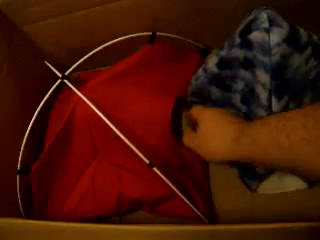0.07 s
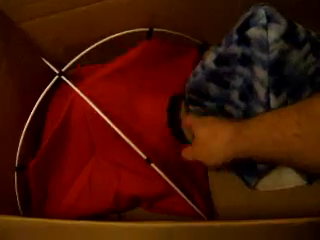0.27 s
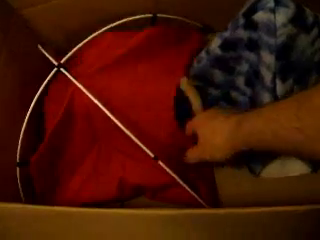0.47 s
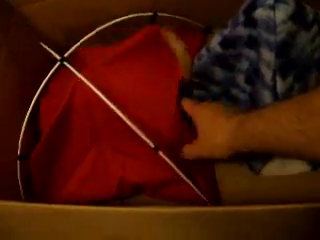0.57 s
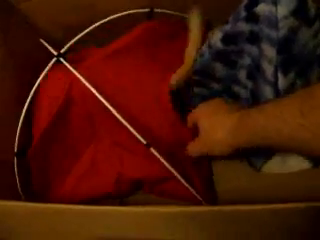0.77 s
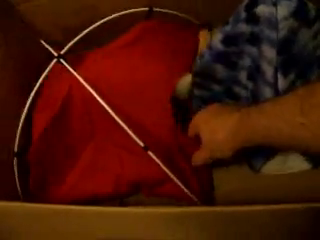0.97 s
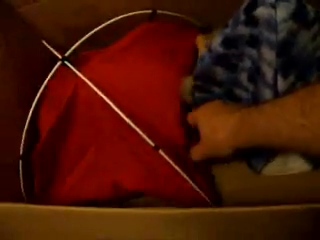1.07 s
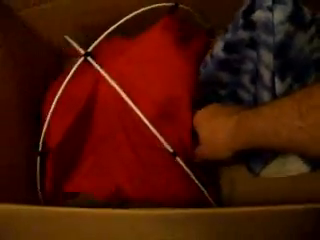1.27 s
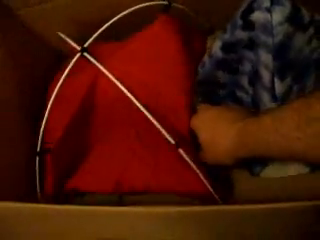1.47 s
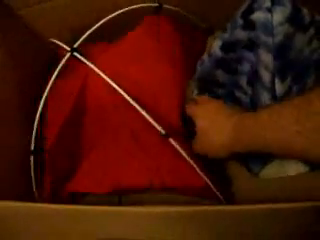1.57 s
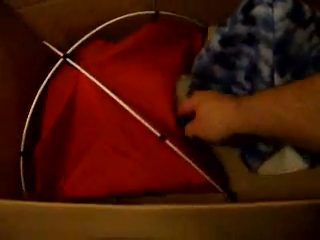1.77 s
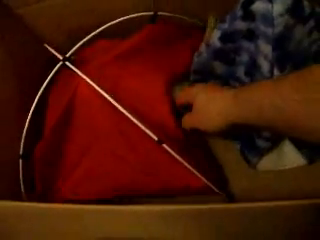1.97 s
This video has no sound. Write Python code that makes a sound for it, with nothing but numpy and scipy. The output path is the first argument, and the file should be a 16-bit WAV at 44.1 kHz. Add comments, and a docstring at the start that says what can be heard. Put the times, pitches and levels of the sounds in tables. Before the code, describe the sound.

Cloth scuffling from a small animal playing in a fabric tent: bright crease cracks, faint squeaks, growing paw knocks, one bassy box thump and rattle midway, then sparser rustling and claw ticks, close and indoors, limited treble.

```python
"""Ferret play in a boxed tent

A hand plays with a ferret in a small fabric tent that stands in a cardboard box, indoors.
Filtered noise makes the sliding cloth, its snapping creases and the paws' knocks on cardboard.
Trains of ticks make the claws on the weave, and gliding harmonic tones a few short squeaks.
One pounce makes the box boom and the tent frame clatter, as sums of decaying modes."""
import sys
import numpy as np
from scipy import signal
from scipy.fft import rfft, irfft
from scipy.io import wavfile

SR = 44100
rng = np.random.default_rng(int(sys.argv[2]) if len(sys.argv) > 2 else 0)


def dump(signal):
    """Clip the signal to [-1, 1] and save it as 16-bit WAV at the path in sys.argv[1]."""
    limited = np.clip(np.atleast_2d(signal).T, -1, 1)
    pcm = np.round(limited * 32767).astype(np.int16)
    wavfile.write(sys.argv[1], SR, pcm)


N = 88332  # samples
T, HZ = np.arange(N) / SR, np.fft.rfftfreq(N, 1 / SR)
EDGE_HZ = 8020  # upper band edge


def amp(db):
    """Converts a level in decibels to an amplitude gain."""
    return 10 ** (np.asarray(db) / 20)


def unit(x):
    """Normalizes to a root-mean-square value of 1."""
    return x / np.sqrt(np.mean(x ** 2) + 1e-20)


def read(points, hz):
    """Spectral envelope: gain interpolated in dB over log frequency."""
    point_hz, db = np.transpose(points)
    return amp(np.interp(np.log(hz + 1), np.log(point_hz), db))


def add(mix, s, sound):
    """Superposition: sums a sound into the mix from its onset time, in place."""
    part = mix[round(s * SR):][:len(sound)]
    part += sound[:len(part)]


def colour(x, points):
    """Linear filtering: weights the spectrum of a full-length sound, then sets its rms to 1."""
    return unit(irfft(rfft(x) * read(points, HZ), N))


def wobble(seconds):
    """Low-pass noise: smooth random motion on a given time scale, at rms 1."""
    return unit(irfft(rfft(rng.standard_normal(N)) / (1 + (HZ * seconds) ** 2), N))


def burst(shape, rise, decay, size=8192):
    """Damped broadband impact: random-phase noise under a quick rise and exponential decay."""
    t, hz = np.arange(size) / SR, np.fft.rfftfreq(size, 1 / SR)
    env = (1 - np.exp(-t / rise)) * np.exp(-t / decay)
    env /= env.max()
    noise = irfft(shape(hz) * np.exp(2j * np.pi * rng.random(len(hz))))
    x = env * noise
    return x * np.linalg.norm(env) / np.linalg.norm(x)  # same energy as the envelope


def ring(blows, modes, rise):
    """Modal superposition: each blow starts the same sum of exponentially decaying sines."""
    modal_sum = sum(amp(db - 60 * T / t60) * np.sin(2 * np.pi * hz * T) for hz, db, t60 in modes)
    tone = -(1 - np.exp(-T / rise)) * modal_sum
    out = np.zeros(N)
    for s, db in blows:
        add(out, s, amp(db) * tone)
    return out


# spectrum of the steady room sound: (frequency [Hz], level [dB])
ROOM_SPECTRUM = [(20, 5.5), (60, -5.5), (110, -8), (180, -9.5), (300, -13), (480, -9), (720, -10.5),
                 (1200, -19.5), (2000, -17), (2500, -19.5), (3400, -28.5), (7200, -6.5), (8000, -18)]


def room_tone():
    """Stationary background noise: Gaussian noise with a fixed spectral envelope."""
    return amp(-43.5) * colour(rng.standard_normal(N), ROOM_SPECTRUM)


def echoes(x, t60, taps_per_s):
    """Reverberation as convolution: sparse reflections of random sign decay 60 dB in t60 seconds."""
    signs = (rng.random(N) < taps_per_s / SR) * rng.choice([-1, 1], N)
    taps = signs * amp(-60 * T / t60) * (T > .001)
    return signal.fftconvolve(x, taps / (np.linalg.norm(taps) + 1e-9))[:N]


# blows that make the box boom: (time [s], level [dB])
BOX_BLOWS = [(.992, -29.5), (1.0905, -14)]
# modes of the box: (frequency [Hz], level [dB], 60 dB decay time [s])
BOX_MODES = [(69.4, -3, 0.39), (80.7, 6.5, 0.1), (96.5, -14, 0.074), (40, -12, 0.29)]


def box_boom():
    """Low modal resonance: the box swells up slowly and rings at a few bass frequencies."""
    return ring(BOX_BLOWS, BOX_MODES, rise=0.011)


# blows that make the tent frame clatter: (time [s], level [dB])
FRAME_BLOWS = [(1.1485, -18.5), (1.155, -34.5)]
# modes of the frame: (frequency [Hz], level [dB], 60 dB decay time [s])
FRAME_MODES = [(358, -1, 0.15), (446.6, -5.5, 0.12), (486, -2.5, 0.1), (698, -3.5, 0.032),
               (1440, -17, 0.034), (1840, -3, 0.11), (1938, 3, 0.11), (2040, -20, 0.12), (2410, -13, 0.11)]


def frame_clatter():
    """Modal resonance of a struck frame: a sharp onset excites modes in the middle range."""
    return ring(FRAME_BLOWS, FRAME_MODES, rise=0.00034)


# one glide per squeak: (time [s], pitch [Hz], level [dB])
SQUEAK_GLIDES = [
    [(.311, 687, -67), (.32, 775, -34), (.332, 780, -27.5), (.348, 902, -36), (.366, 910, -37.5),
     (.377, 895, -48)],
    [(.735, 1330, -61), (.757, 1363, -30), (.781, 1323, -35.5), (.801, 1116, -37), (.812, 974, -45),
     (.835, 990, -41)],
    [(.876, 966, -38), (.888, 976, -45), (.903, 970, -37)],
]
# levels of the harmonics, from the fundamental up: (level [dB])
HARMONICS_DB = [-7.5, -25, -22.5, -25.5]
PITCH_JITTER, JITTER_S = 0.0238, 0.003  # rms fraction of the pitch, time scale


def squeaks():
    """Harmonic series: thin gliding tones with weak overtones and an unsteady pitch."""
    out = np.zeros(N)
    for glide in SQUEAK_GLIDES:
        s, hz, db = np.transpose(glide)
        pitch = np.interp(T, s, hz) * (1 + PITCH_JITTER * wobble(JITTER_S))
        turns = np.cumsum(pitch) / SR  # phase in cycles
        tone = sum(amp(level) * np.sin(2 * np.pi * k * turns) for k, level in enumerate(HARMONICS_DB, 1))
        out += unit(tone) * np.interp(T, s, amp(db), left=0, right=0)
    return out


# paws and body on cardboard: (time [s], level [dB], decay constant [s], pitch [Hz])
CARDBOARD_KNOCKS = [(0.691, -34, 0.04, 135), (.706, -31.5, 0.0027, 500), (.754, -21, 0.004, 740),
                    (0.755, -31.5, 0.033, 195), (.8712, -22, 0.0034, 920), (.869, -29.5, 0.011, 370),
                    (.935, -38, 0.0095, 400), (0.9851, -26, 0.0016, 1290), (.994, -29, 0.024, 190),
                    (.999, -29.5, 0.0092, 750), (1.089, -21.5, 0.024, 238), (1.094, -25, 0.0059, 704),
                    (1.13, -31, 0.0022, 600), (1.1474, -23.5, 0.016, 394), (1.132, -32, 0.029, 205),
                    (1.1487, -23, 0.009, 2050), (1.1535, -19.5, 0.0046, 1850), (1.169, -46, 0.0068, 450),
                    (1.273, -32, 0.0067, 760), (1.4338, -28.5, 0.0038, 1240), (1.438, -33, 0.009, 260),
                    (1.547, -31.5, 0.0026, 1300), (1.553, -36.5, 0.024, 243), (1.631, -33.5, 0.004, 860),
                    (1.683, -34.5, 0.038, 226), (1.6995, -33.5, 0.0045, 550), (1.7535, -25.5, 0.0024, 950),
                    (1.754, -35, 0.036, 165), (1.768, -34.5, 0.011, 750), (1.843, -25.5, 0.011, 850),
                    (1.856, -23.5, 0.014, 1160), (1.848, -36, 0.032, 340), (1.9431, -29, 0.011, 1630)]
KNOCK_OCTAVES, KNOCK_RISE_S = 0.51, 0.00036  # resonance width, rise constant
KNOCK_BED_DB, KNOCK_LOW_CUT_HZ, KNOCK_HIGH_CUT_HZ = -9, 300, 2500


def thud(hz, pitch):
    """Spectrum of a damped panel: one wide resonance over a band-limited bed."""
    peak = np.exp(-.5 * (np.log2((hz + 1) / pitch) / KNOCK_OCTAVES) ** 2)
    low_cut = hz / np.hypot(hz, KNOCK_LOW_CUT_HZ)
    bed = amp(KNOCK_BED_DB) * low_cut / np.hypot(1, hz / KNOCK_HIGH_CUT_HZ)
    return peak + bed / (1 + hz / (2 * pitch))


def knocks():
    """Heavily damped impact: dull blows on cardboard die away at once."""
    out = np.zeros(N)
    for s, db, decay, pitch in CARDBOARD_KNOCKS:
        add(out, s, amp(db) * burst(lambda hz: thud(hz, pitch), KNOCK_RISE_S, decay))
    return out


# broad bed of taut cloth, relative to its resonance peak: (frequency [Hz], level [dB])
CLOTH_BED = [(50, -39), (250, -23), (1000, -27.5), (2500, -11.5), (3800, -12.5), (5500, -8), (8000, -14)]


def crease(hz, pitch, width):
    """Spectrum of taut cloth: one resonance over a broad bed."""
    return np.exp(-.5 * ((hz - pitch) / width) ** 2) + read(CLOTH_BED, hz)


# claws over the weave: (time [s], length [s], level [dB], pitch [Hz], width [Hz],
# threads per second [1/s], unevenness [0-1])
CLAW_STROKES = [(0.8047, 0.0078, -19, 5440, 1000, 1140, 0.03), (0.804, 0.011, -27.5, 2540, 248, 1167, 0.07),
                (0.879, 0.017, -28.5, 6200, 1200, 880, 0.28), (1.621, 0.048, -41.5, 4870, 750, 1560, 0.48),
                (1.842, 0.0071, -14, 6450, 650, 1100, 0.01), (1.8482, .012, -21, 6800, 600, 1000, 0.29),
                (1.841, 0.0072, -19.5, 4200, 400, 1200, .1), (1.849, 0.024, -28, 4100, 250, 1200, 0.13)]
STROKE_SKEW = 0.65  # below 1 the force peaks early in the stroke


def scratches(size=4096, count=120):
    """Quasi-periodic impulse excitation: a claw ticks from thread to thread, swelling and letting go."""
    out, hz = np.zeros(N), np.fft.rfftfreq(size, 1 / SR)
    for s, length, db, pitch, width, rate, uneven in CLAW_STROKES:
        gaps, force = rng.standard_normal((2, count))
        at = np.cumsum(np.exp(uneven * gaps)) / rate - .5 / rate
        swell = np.sin(np.pi * np.clip(at / length, 0, 1) ** STROKE_SKEW)
        push = swell * np.exp(uneven * force)
        # each tick is a phase ramp in the spectrum, so it can fall between samples
        impulses = push @ np.exp(-2j * np.pi * np.outer(at, hz))
        ticks = irfft(impulses * crease(hz, pitch, width) * (hz < EDGE_HZ))
        add(out, s, amp(db) * unit(ticks) * np.sqrt(length * SR / size))  # level over the stroke
    return out


# creases snapping: (time [s], level [dB], decay constant [s], pitch [Hz])
CREASE_SNAPS = [(0.3185, -26.5, 0.0017, 5560), (0.4228, -10, 0.002, 6770), (0.426, -14, 0.00063, 6460),
                (0.4321, -12.5, 0.00082, 6500), (0.4472, -23.5, .0018, 6500), (.5585, -29.5, 0.0013, 4750),
                (0.706, -30, 0.0036, 4440), (0.845, -17, 0.0025, 3870), (.9012, -30, 0.00092, 7200),
                (0.9068, -12, 0.00051, 7200), (0.9417, -23.5, 0.0019, 6150), (0.9993, -24.5, 0.0036, 2970),
                (1.098, -20, 0.0016, 3500), (1.1313, -20, 0.0016, 4600), (1.1477, -12, 0.0016, 7400),
                (1.153, -18.5, 0.0036, 5200), (1.159, -22, 0.0022, 7200), (1.169, -11, 0.0015, 7170),
                (1.2208, -25.5, 0.0013, 6060), (1.531, -35, .002, 5000), (1.548, -28, 0.0026, 2480),
                (1.699, -27.5, 0.0026, 5300)]
SNAP_WIDTH_HZ, SNAP_RISE_S = 690, 0.00011


def snaps():
    """Sudden release of tension: creases flip over with short bright cracks."""
    out = np.zeros(N)
    for s, db, decay, pitch in CREASE_SNAPS:
        add(out, s, amp(db) * burst(lambda hz: crease(hz, pitch, SNAP_WIDTH_HZ), SNAP_RISE_S, decay))
    return out


# sliding cloth: (time [s], treble level [dB], middle level [dB])
CLOTH_SLIDES = [(0.169, -35.5, -43), (.21, -40, -46.5), (.25, -47.5, -50), (0.281, -40, -44.5),
                (.306, -53, -50.5), (.328, -36, -41), (.41, -47, -48), (.45, -42.5, -43),
                (.475, -38.5, -49.5), (0.547, -38, -40), (0.57, -32, -37.5), (0.622, -45, -47.5),
                (.70, -41.5, -47), (.745, -42, -42), (.76, -32.5, -29), (.798, -34, -37.5),
                (.815, -28, -27.5), (.838, -38, -41), (.862, -34, -37), (0.888, -21.5, -37.5),
                (0.914, -35.5, -45.5), (.938, -35.5, -37), (.948, -28, -28.5), (0.973, -38, -36.5),
                (1.0, -38.5, -36), (1.03, -36.5, -43), (1.058, -38, -47.5), (1.069, -31, -30),
                (1.09, -36, -49), (1.12, -34.5, -39), (1.175, -30.5, -29), (1.21, -37, -41.5),
                (1.25, -40, -43), (1.33, -43, -45.5), (1.44, -35, -46.5), (1.51, -40.5, -45),
                (1.56, -38.5, -42.5), (1.61, -39.5, -47), (1.66, -33.5, -44.5), (1.735, -41.5, -44),
                (1.775, -35, -50.5), (1.825, -40.5, -41), (1.875, -33.5, -41.5), (1.916, -35.5, -38),
                (1.94, -33, -40), (1.965, -36.5, -47.5), (2.0, -45, -46)]
# spectrum of the bright hiss: (frequency [Hz], level [dB])
HISS_SPECTRUM = [(900, -34), (2000, -20.5), (2800, -3), (4300, -0.5), (5400, -0.5), (7300, 4), (8200, -5)]
# spectrum of the duller scuff: (frequency [Hz], level [dB])
SCUFF_SPECTRUM = [(50, -28), (130, -5.5), (200, -4), (350, -1), (520, -6.5), (700, -6), (950, -1),
                  (1600, -5), (2400, -6), (4000, -23.5), (8000, -37)]
CLICKS_PER_S, CLICK_SPREAD_DB, CLICK_SHARE = 2500, 3, 0.38  # share of the power
FLUTTER_DB, FLUTTER_S = 2.17, 0.0056  # rms level change, time scale


def cloth():
    """Friction noise: a wash and tiny fibre clicks drive both a bright hiss and a duller scuff."""
    s, treble, middle = np.transpose(CLOTH_SLIDES)
    signs = (rng.random(N) < CLICKS_PER_S / SR) * rng.choice([-1, 1], N)
    clicks = signs * amp(CLICK_SPREAD_DB * np.minimum(rng.exponential(1, N), 4))
    wash = rng.standard_normal(N)
    friction = np.sqrt(CLICK_SHARE) * unit(clicks) + np.sqrt(1 - CLICK_SHARE) * wash
    drive = friction * amp(FLUTTER_DB * wobble(FLUTTER_S))
    hiss = colour(drive, HISS_SPECTRUM) * amp(np.interp(T, s, treble))
    scuff = colour(drive, SCUFF_SPECTRUM) * amp(np.interp(T, s, middle))
    return hiss + scuff


def scene():
    """Direct and reflected sound: the scuffle, the near walls of the box, and the room."""
    direct = cloth() + snaps() + scratches() + knocks() + squeaks() + frame_clatter()
    walls = amp(-14.5) * echoes(direct, t60=0.04, taps_per_s=1500)
    room = amp(-15) * echoes(direct, t60=0.24, taps_per_s=2500)
    return (direct + walls + room + box_boom() + room_tone())[None]


START_S, FADE_S = 0.16, 0.0055
OVERLOAD = .8  # amplitude that the rounded peaks approach
LEAK_HZ, LEAK_DB = 11200, -35.5  # upper limit and level of the weak leak above the edge


def record(dry):
    """Soft saturation and band limiting: after a short silence, peaks are rounded and
    a steep low-pass dulls the sound, with a weak leak above it."""
    live = dry * np.clip((T - START_S) / FADE_S, 0, 1)
    rounded = live / (1 + (live / OVERLOAD) ** 4) ** (1 / 4)
    lowpass = signal.firwin(255, EDGE_HZ, window=("kaiser", 7), fs=SR)
    leak = signal.firwin(255, LEAK_HZ, window=("kaiser", 7), fs=SR)
    return signal.oaconvolve(rounded, (lowpass + amp(LEAK_DB) * leak)[None], "same")


dry = scene()
out = record(dry)
dump(out)
```